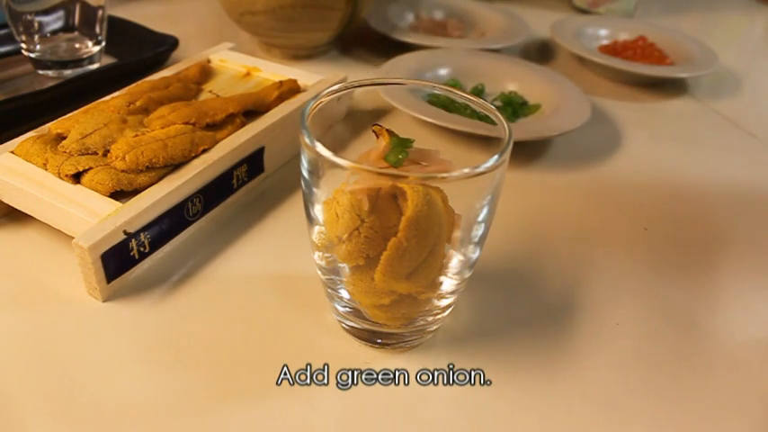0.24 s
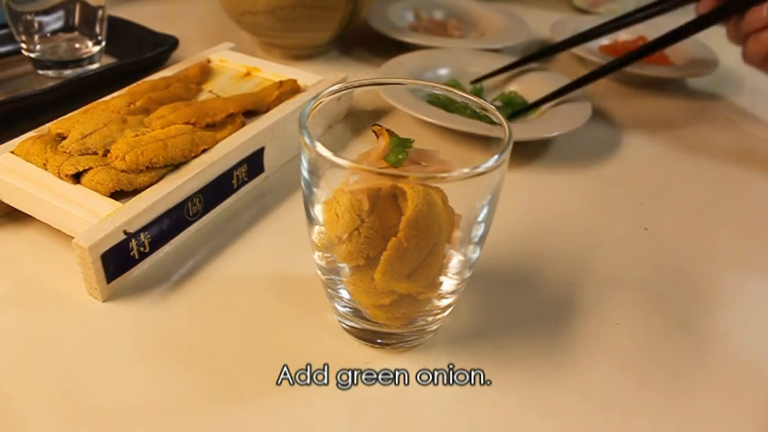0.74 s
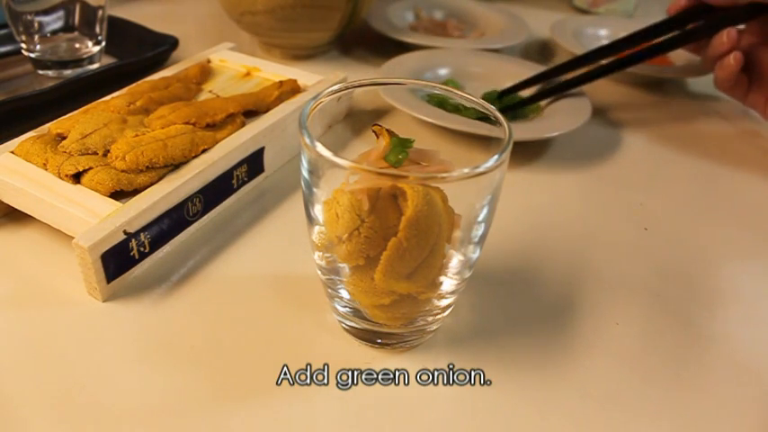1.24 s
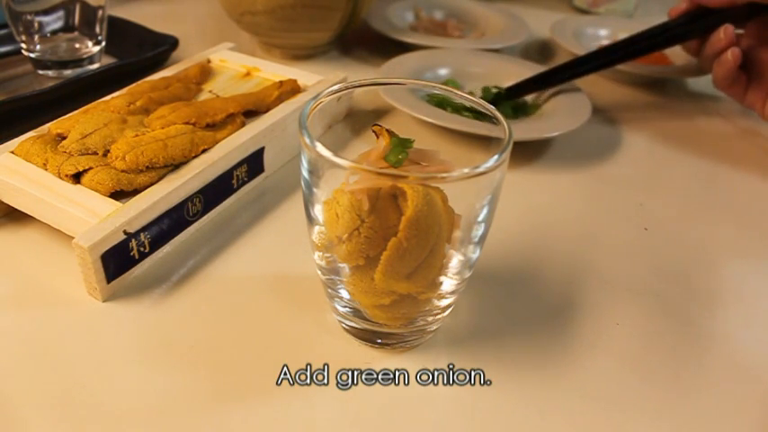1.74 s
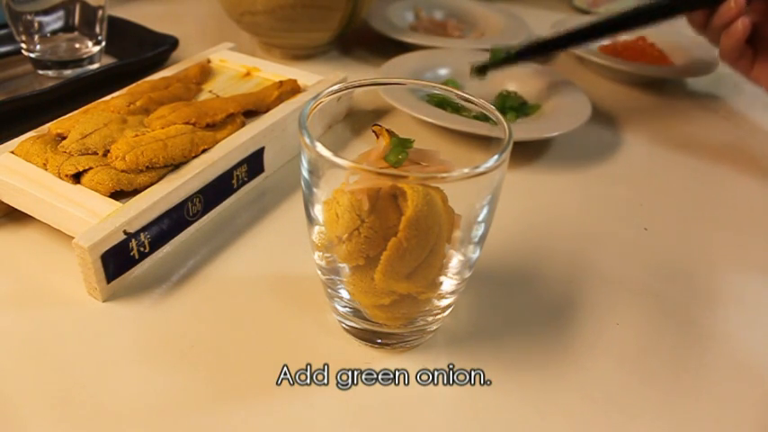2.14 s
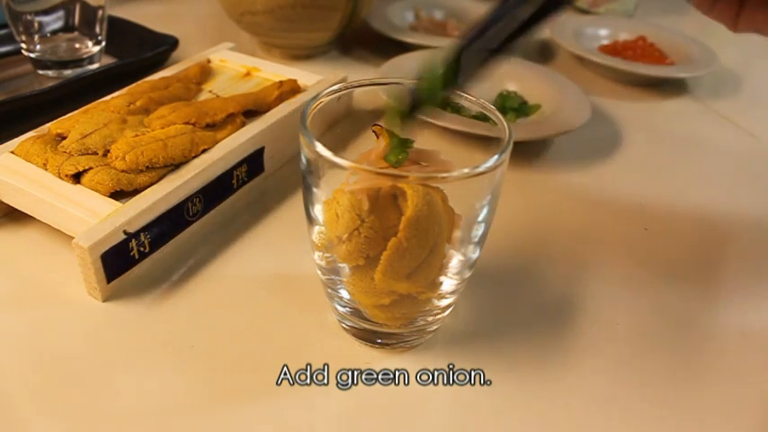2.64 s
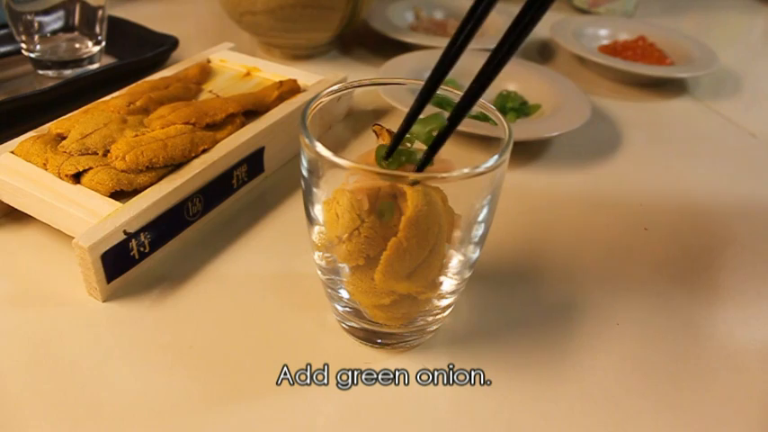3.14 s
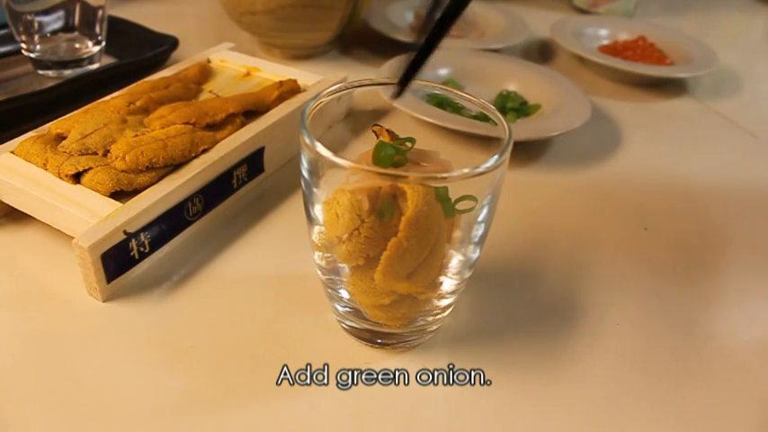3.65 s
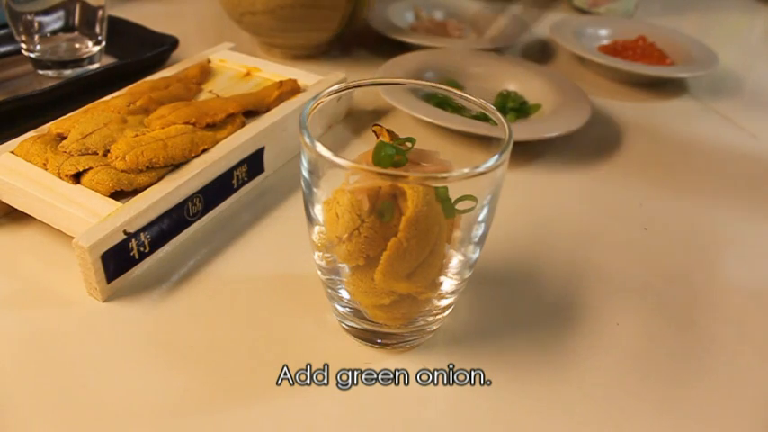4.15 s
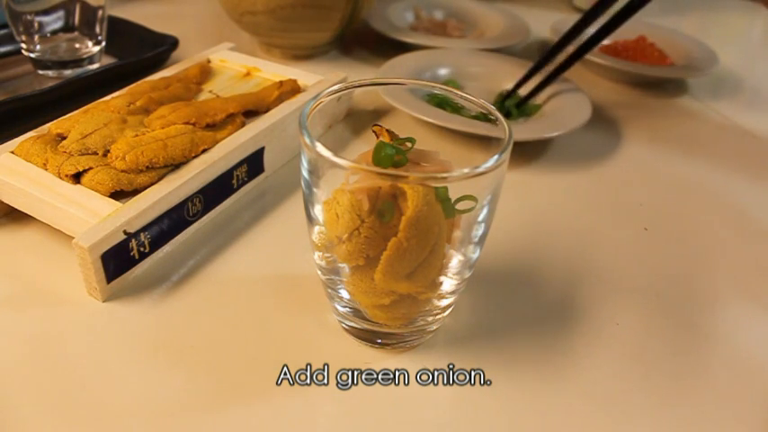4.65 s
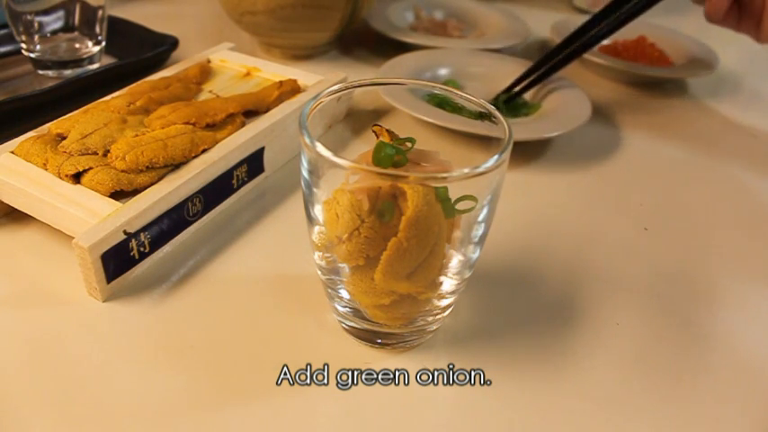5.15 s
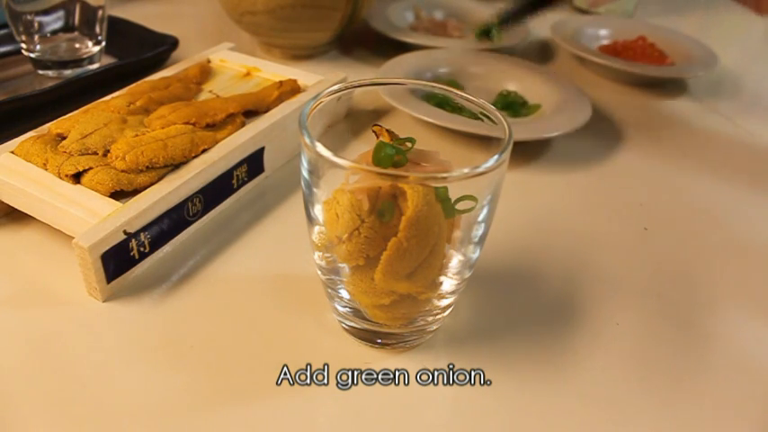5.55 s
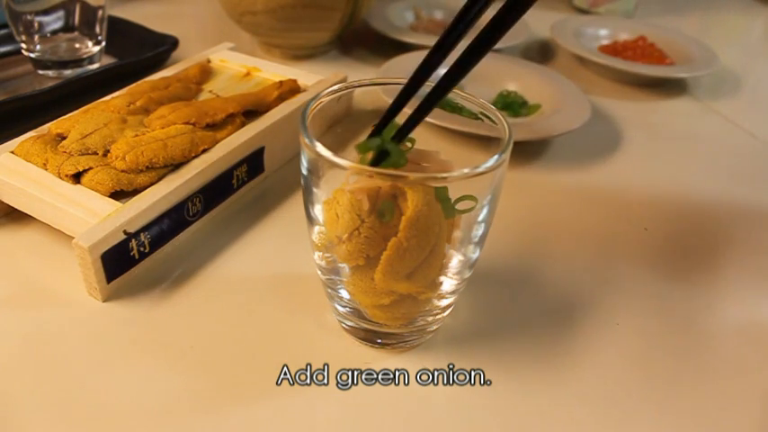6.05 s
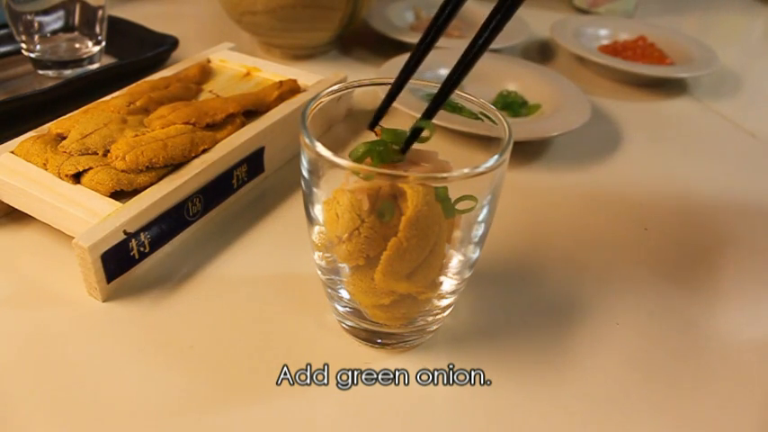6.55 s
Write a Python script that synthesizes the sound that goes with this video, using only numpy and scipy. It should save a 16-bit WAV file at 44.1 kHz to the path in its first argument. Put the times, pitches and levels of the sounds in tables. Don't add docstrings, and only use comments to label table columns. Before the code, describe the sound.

A steady refrigerator hum, low and buzzing with soft fan air, fills a small, slightly reverberant kitchen for about seven seconds. Close by, from 0.6 to 1.2 s, chopstick tips rub faintly through chopped onion and tick a small plate, clearest near 0.87 and 1.0 s. Then almost only hum, with a barely audible brush at 2.5 s. A dull soft rub comes at 3.4 s, and at 3.62 s the sticks meet in a very quick fading wooden chatter. Crisp plate taps sound at 4.42 and 4.57 s, with tiny dry stick clicks between. Further off, crockery scrapes in two slips at 5.37 and 5.49 s, then crashes at 5.66 s, hard and bright, with last knocks by 5.75 s. The microphone level ducks, leaving the hum thinner; it creeps back from about 6 s, with one faint rub near 6.27 s.

```python
import sys
import numpy as np
from scipy import signal
from scipy.fft import rfft, irfft, next_fast_len
from scipy.io import wavfile
from scipy.ndimage import uniform_filter1d

SR = 44100
rng = np.random.default_rng(int(sys.argv[2]) if len(sys.argv) > 2 else 0)


def master_out(mix):
    frames = np.transpose(np.atleast_2d(mix))
    ceiling = np.clip(frames, -1, 1)
    pcm = np.round(ceiling * 32767).astype(np.int16)
    wavfile.write(sys.argv[1], SR, pcm)


def how_loud(loudness_db):
    steps = np.asarray(loudness_db, float) / 20
    return 10 ** steps


N = 299439

# f/Hz, level/dB, t60/s
PLATE_MODES = [(600, -8, .04), (1080, -2, .045), (2450, -2, .03), (3880, -2, .026), (4780, -6, .022),
               (5850, -3, .02), (6600, -8, .014), (7600, -2, .018), (8700, -7, .01), (9500, -5, .012),
               (10300, -4, .008), (11200, -6, .007), (12200, -5, .008), (13300, -8, .006),
               (14600, -9, .007)]


def unit(x):
    return x / np.sqrt(np.mean(x ** 2) + 1e-20)


def along(points, hz):
    f, v = np.transpose(points)
    return np.interp(np.log(hz + 1), np.log(f + 1), v)


def wobble(rate):
    knots = rng.standard_normal(int(N * rate / SR) + 4)
    return np.interp(np.arange(N) * rate / SR, np.arange(len(knots)), knots)


def filtered(x, response):
    m = next_fast_len(len(x) + 8192)
    return irfft(rfft(x, m) * response(np.fft.rfftfreq(m, 1 / SR)), m)[:len(x)]


def resonances(peaks, f):
    total = 0
    for k, (centre, width, db) in enumerate(peaks):
        damping = 1j * f * width
        total = total + (-1) ** k * how_loud(db) * damping / (centre * centre - f * f + damping)
    return total


def ringing(modes, t, tilt_db, scatter_db):
    luck = rng.standard_normal((len(modes), 2))
    ring = np.zeros(len(t))
    for k, ((hz, db, t60), (stronger, sharper)) in enumerate(zip(modes, luck)):
        level = db + tilt_db * np.log2(hz / 4000) + scatter_db * stronger
        tone = np.sin(2 * np.pi * hz * (1 + 0.011 * sharper) * t)
        ring += (-1) ** k * how_loud(level - 60 * t / t60) * tone
    return ring * (1 - np.exp(-t / .00015))


def add(track, s, sound):
    part = track[round(s * SR):][:len(sound)]
    part += sound[:len(part)]


def kitchen(x):
    # f/Hz, t60/s
    decay_times = [(300, 0.3), (3000, 0.18), (12000, 0.12)]
    hz, t, z = signal.stft(rng.standard_normal(len(x)), SR, nperseg=256)
    decay = how_loud(-60 * t / along(decay_times, hz)[:, None])
    tail = signal.istft(z * decay, SR, nperseg=256)[1]
    return signal.fftconvolve(np.pad(x, (200, 0)), tail / np.linalg.norm(tail))[:len(x)]


def strikes(rows, modes, scatter_db, snap_db, snap_s, rattle_db, rattle_s, room_db):
    out, t = np.zeros(N), np.arange(SR // 4) / SR
    for s, db, tilt_db, crack_db in rows:
        ring = ringing(modes, t, tilt_db, scatter_db)
        crack_phase = 2 * np.pi * rng.uniform(8000, 10500) * t * (1 - 150 * t).clip(.5)
        crack = how_loud(-60 * t / .0013) * np.sin(crack_phase)
        contact = filtered(rng.standard_normal(len(t)), lambda f: f * f / (f * f + 350 ** 2) * how_loud(-f / 1900))
        snap = how_loud(snap_db - 60 * t / snap_s) * unit(contact)
        blow = ring / np.abs(ring).max() + how_loud(crack_db) * crack / np.abs(crack).max() + snap
        blow = how_loud(db) * blow
        nearby = rng.standard_normal(len(t)) * how_loud(-60 * t / rattle_s) * (t > .001)
        rattle = signal.fftconvolve(blow, nearby / np.linalg.norm(nearby))[:len(t)]
        add(out, s, blow + how_loud(rattle_db) * rattle + how_loud(room_db) * kitchen(blow))
    return out


def refrigerator():
    # multiple of the shaft/1, level/dB rms
    shaft_orders = [(1, -58), (2, -70), (6, -43), (7, -54), (8, -62), (14, -65), (18, -71), (36, -72),
                    (47, -74), (81, -73), (110, -70)]
    # multiple of the mains/1, level/dB rms
    mains_orders = [(2, -60), (4, -68), (6, -62), (12, -61), (14, -64), (16, -62), (18, -66), (20, -65),
                    (22, -64), (23, -71), (24, -69), (25, -72), (26, -67), (28, -77), (32, -75), (34, -77),
                    (37, -74), (42, -78), (44, -78), (46, -71)]
    # f/Hz, level/dB rms, waver/Hz
    fan_tones = [(382, -62, 0.39), (449, -59, 2.5), (50, -87, .5)]
    # f/Hz, level/dB per Hz
    air_spectrum = [(15, -40), (28, -17), (42, -24), (60, -32), (80, -17), (125, -9.5), (262, -13.5),
                    (515, -9), (958, -13), (2000, -21.5), (3600, -24), (6200, -31), (10000, -36),
                    (15900, -39)]
    # f/Hz, width/Hz, level/dB
    casing_modes = [(323, 33, -2), (415, 93, -16), (3610, 153, -6.5), (6150, 370, -11), (7900, 390, -12),
                    (9360, 220, -8), (12100, 230, -9)]
    # strongest multiple/1, orders below/1, orders above/1, level/dB rms
    valve_groups = [(62, 2, 1, -70), (72, 2, 3, -80), (91, 2, 4, -81), (102, 2, 1, -70), (140, 3, 1, -71),
                    (157, 1, 1, -76), (162, 0, 3, -80), (180, 0, 0, -84), (202, 1, 2, -80)]
    shaft_hz, mains_hz = 58.585, 59.98
    skirt_db = 6.5

    t = np.arange(N) / SR
    turn = 2 * np.pi * (shaft_hz * t + np.cumsum(0.0116 * wobble(5.14)) / SR)
    knocks = []
    for top, below, above, db in valve_groups:
        for k in range(top - below, top + above + 1):
            knocks.append((k, db - skirt_db * np.sqrt(abs(k - top))))
    hum = np.zeros(N)
    for k, db in shaft_orders + knocks:
        flutter = min(k / 60, 1)
        level = db + 3 + 1.2 * flutter + (.6 + 2.4 * flutter) * wobble(16)
        phase = k * turn + rng.uniform(0, 2 * np.pi) + .8 * flutter * wobble(20)
        hum += how_loud(level) * np.sin(phase)
    for k, db in mains_orders:
        hum += how_loud(db + 3) * np.sin(2 * np.pi * k * mains_hz * t + rng.uniform(0, 2 * np.pi))
    for hz, db, waver_hz in fan_tones:
        phase = 2 * np.pi * np.cumsum(hz + waver_hz * wobble(4)) / SR
        hum += how_loud(db + 4.0 + 3.1 * wobble(2.96)) * np.sin(phase)

    def air_response(f):
        return how_loud(along(air_spectrum, f)) * (1 + 1.03 * np.abs(resonances(casing_modes, f)))

    air = unit(filtered(rng.standard_normal(N), air_response))
    return hum + how_loud(-46 + 0.41 * wobble(2.814)) * air


def surges(rows, rise_s, faster):
    power = np.zeros(N)
    for s, db, hold_s, fade_db in rows:
        t = np.arange(N) / SR - s
        rise = 30 * t.clip(None, 0) / rise_s
        fade = faster * fade_db * (t - hold_s / faster).clip(0)
        power += how_loud(2 * (db + rise - fade))
    return np.sqrt(power)


def crockery(rows, tone, rings, ring_db, spiky_db, rise_s, edge_db, edge_faster):
    hail = rng.standard_normal(N) * how_loud(spiky_db * wobble(900))
    modes = [(hz, width, min(0.71 * db, 1)) for hz, width, db in rings]
    sound = filtered(hail, lambda f: how_loud(along(tone, f)) * (1 + how_loud(ring_db) * resonances(modes, f)))
    edge = filtered(sound, lambda f: 1 / (1 + (6800 / (f + 1)) ** 8))
    body = surges(rows, rise_s, 1) * unit(sound - edge)
    return body + how_loud(edge_db) * surges(rows, rise_s, edge_faster) * unit(edge)


def sliding_pile():
    # t/s, level/dB rms, hold/s, fade/dB per s
    slips = [
        (5.372, -27, 0.049, 183),
        (5.486, -33, .002, 129),
    ]
    # f/Hz, level/dB per Hz
    scrape_spectrum = [(280, -21), (550, -10), (800, -4.5), (1100, -4.5), (2400, -4.5), (3900, -6.5),
                       (4700, -10), (7300, -20.5), (15900, -32)]
    # f/Hz, width/Hz, level/dB
    scrape_modes = [(1075, 50, -12.5), (1480, 68, 4), (1750, 28, -8), (2120, 35, 1), (2760, 89, -9),
                    (3550, 68, 2), (3940, 58, -4), (4320, 28, 2), (5080, 130, -7), (6160, 250, 2),
                    (7250, 90, 2), (8280, 44, -14), (10900, 34, -14)]
    return crockery(slips, scrape_spectrum, scrape_modes, ring_db=10.5, spiky_db=2.0, rise_s=0.0074,
                    edge_db=-12.5, edge_faster=1.35)


def clatter():
    # t/s, level/dB rms, hold/s, fade/dB per s
    falls = [
        (5.659, -25.5, 0.03, 103),
        (5.727, -28, 0.051, 234),
    ]
    # f/Hz, level/dB per Hz
    clatter_spectrum = [(250, -36), (600, -16.5), (900, -10.5), (1500, -11), (2800, -5), (4200, -4.5),
                        (5500, -6), (8000, -5.5), (12600, -7.5), (15900, -12.5)]
    # f/Hz, width/Hz, level/dB
    clatter_modes = [(870, 52, -8.5), (2195, 58, 1.5), (2900, 110, -9.5), (3755, 40, 2), (4100, 46, -6),
                     (4330, 36, -2), (4800, 60, -6), (5430, 30, -4), (6730, 35, -4), (6900, 40, -4),
                     (8340, 38, -13), (8960, 30, -5), (11400, 130, -12), (12600, 200, -5)]
    # t/s, peak level/dB, brightness/dB per octave, crack/dB
    knocks = [
        (5.372, -30, 0, 7),
        (5.409, -31, -5, -6),
        (5.4825, -33, 2, 3),
        (5.6585, -23, 5, -3),
        (5.6607, -2, -0.5, -9),
        (5.664, -16, -5, 0),
        (5.6695, -13, 7, -3),
        (5.6775, -18, -3, 1),
        (5.701, -10, -3, 3),
        (5.722, -13, -2, -2),
    ]
    # f/Hz, level/dB, t60/s
    dish_modes = [(2945, -5, 0.07), (3520, 2, 0.024), (4040, 8, 0.027), (5276, 2.5, 0.049),
                  (7400, -16, .05), (9050, -9, .06), (12750, 6, .016), (13300, -12, .02)]
    hail = crockery(falls, clatter_spectrum, clatter_modes, ring_db=7.5, spiky_db=1.0, rise_s=0.0058,
                    edge_db=-2.5, edge_faster=1.36)
    return how_loud(6.5) * hail + strikes(knocks, dish_modes, scatter_db=1.5, snap_db=-11, snap_s=0.014,
                                     rattle_db=-7.0, rattle_s=0.047, room_db=-7)


def brushes():
    # t/s, length/s, level/dB rms, brightness/dB per octave
    rubs = [(0.624, .04, -59, 3), (0.793, 0.051, -56, -1), (0.833, 0.019, -44.5, 5), (0.863, 0.023, -50, 4),
            (0.908, 0.029, -48, 1), (1.065, 0.042, -56.5, 2), (1.183, 0.021, -50.5, 1),
            (2.489, .04, -55.5, -1), (3.393, 0.074, -50, -6), (3.408, .02, -56, 8), (3.547, 0.055, -55, -1),
            (4.597, 0.042, -52.5, 0), (4.864, 0.031, -55, 3), (6.267, 0.041, -54, 2)]
    # f/Hz, level/dB per Hz
    rub_spectrum = [(500, -37), (900, -9), (1500, -14.5), (3000, -7), (6000, -11.5), (10000, -15),
                    (15900, -24)]
    out, t = np.zeros(N), np.arange(SR // 3) / SR
    damped_plate = [(hz, 160, db) for hz, db, _ in PLATE_MODES]
    for s, length, db, tilt_db in rubs:
        grit = rng.standard_normal(len(t)) * how_loud(18 * uniform_filter1d(rng.standard_normal(len(t)), size=30))

        def rub_response(f):
            tone = how_loud(along(rub_spectrum, f) + tilt_db * np.log2(f / 6000 + .01))
            return tone * (1 + np.abs(resonances(damped_plate, f)))

        swell = np.sqrt(np.sin(np.pi * np.clip(t / length, 0, 1)).clip(0))
        stroke = how_loud(db) * unit(filtered(grit, rub_response)) * swell
        add(out, s, stroke + how_loud(-2) * kitchen(stroke))
    return out


def pings():
    # t/s, peak level/dB, f/Hz, t60/s
    rim_pings = [(.835, -35.5, 2740, .025), (.843, -41, 2800, .02), (.866, -33, 5900, .018),
                 (.872, -43, 2450, .03), (.94, -41, 2750, .03), (1.012, -36, 2350, 0.023),
                 (1.012, -39, 1100, .04), (.9, -38, 1050, .03), (1.19, -46, 5200, .02),
                 (4.578, -39, 1154, .06), (4.422, -33, 3900, .03), (4.576, -34, 3900, .025),
                 (4.546, -40, 8650, .03)]
    out, t = np.zeros(N), np.arange(SR // 3) / SR
    for s, db, hz, t60 in rim_pings:
        ping = how_loud(db - 60 * t / t60) * (1 - np.exp(-t / 0.0007)) * np.sin(2 * np.pi * hz * t)
        add(out, s, ping + how_loud(-9) * kitchen(ping))
    return out


def chopsticks():
    # t/s, peak level/dB, brightness/dB per octave, crack/dB
    plate_taps = [(.835, -42, 2, -3), (.8425, -36, 3, 0), (.8660, -28.5, 4, 0), (.8765, -40, -8, -2),
                  (1.0100, -31, 1, 3), (1.019, -40, 6, 2), (4.4198, -19.5, 0.5, -7), (4.4215, -26.5, 4, -9),
                  (4.4275, -30.5, -6.5, -7), (4.4325, -40, 0, 2), (4.4835, -34.5, 8, 5),
                  (4.5736, -21.5, 1.5, -1), (4.5762, -30, 3, 0)]
    # t/s, peak level/dB, brightness/dB per octave, crack/dB
    stick_clicks = [
        (4.501, -43, 8, 0),
        (4.529, -47, 8, 0),
        (4.539, -42, 8, 2),
        (4.5456, -29.5, 11, 1),
        (4.5485, -37, 5, 2),
        (4.557, -33, 10, 0),
        (4.561, -37, 8, -2),
    ]
    # f/Hz, level/dB, t60/s
    stick_modes = [(1712, -13, .025), (4620, 0, .016), (6700, -2, .016), (8700, -5, .008),
                   (10700, -7, .007), (13100, -16, .008)]
    meet_s, meet_db, beat_s = 3.6237, -25, .0085
    beat_loss_db, glancing_db = 4, 6.5
    chatter = []
    for k in range(4):
        level = meet_db - beat_loss_db * k - glancing_db * (k % 2)
        chatter.append((meet_s + k * beat_s, level, -1.5, -16))

    sound = strikes(plate_taps, PLATE_MODES, scatter_db=2.5, snap_db=-8, snap_s=.015,
                    rattle_db=-4, rattle_s=0.06, room_db=-9.0)
    sound += strikes(chatter, stick_modes, scatter_db=0.2, snap_db=-30, snap_s=.012,
                     rattle_db=-7, rattle_s=.025, room_db=-17)
    sound += strikes(stick_clicks, stick_modes, scatter_db=-3.0, snap_db=-4, snap_s=0.015,
                     rattle_db=-5, rattle_s=0.034, room_db=-9)
    return sound + brushes() + pings()


def scene():
    return (refrigerator() + sliding_pile() + clatter() + chopsticks())[None]


def top_cut(x):
    return signal.sosfilt(signal.butter(12, 16980, fs=SR, output="sos"), x)


def record(dry):
    duck_s, duck_db = 5.655, 9.5
    grab_s, hold_s, recover_s = 0.01, 0.31, 0.28
    top_hz = 15950
    t = (np.arange(N) / SR - duck_s).clip(0)
    grab = t / (t + grab_s)
    recovery = np.exp(-(t - hold_s).clip(0) / recover_s)
    ducked = dry[0] * how_loud(-duck_db * grab * recovery)
    limited = filtered(ducked, lambda f: np.where(f < top_hz, 1, how_loud(-55)))
    return top_cut(limited[None])


dry = scene()
out = record(dry)
master_out(out)
```